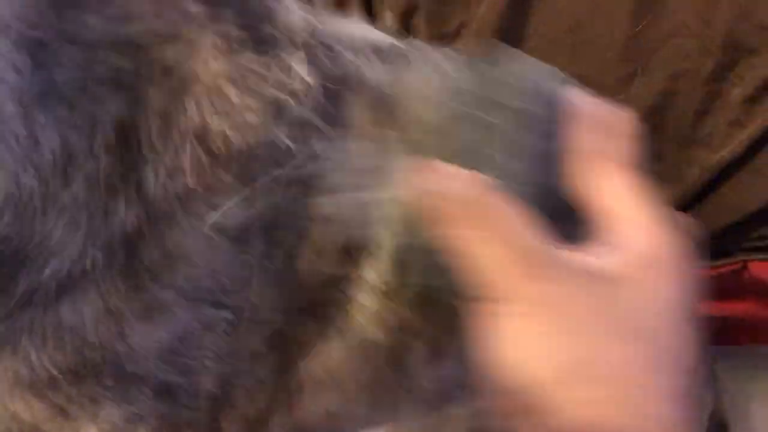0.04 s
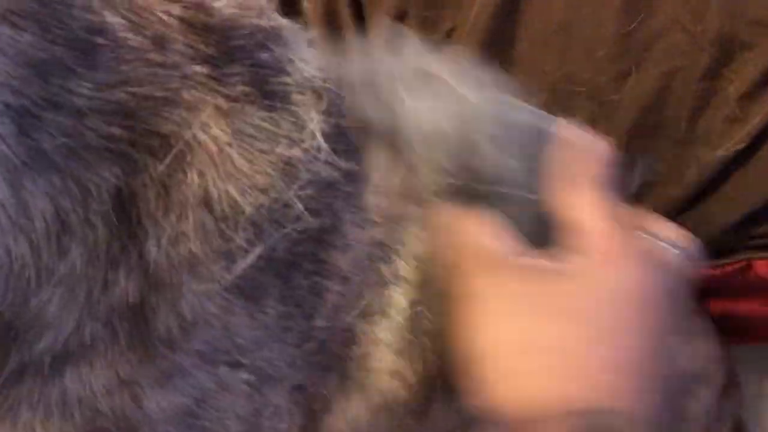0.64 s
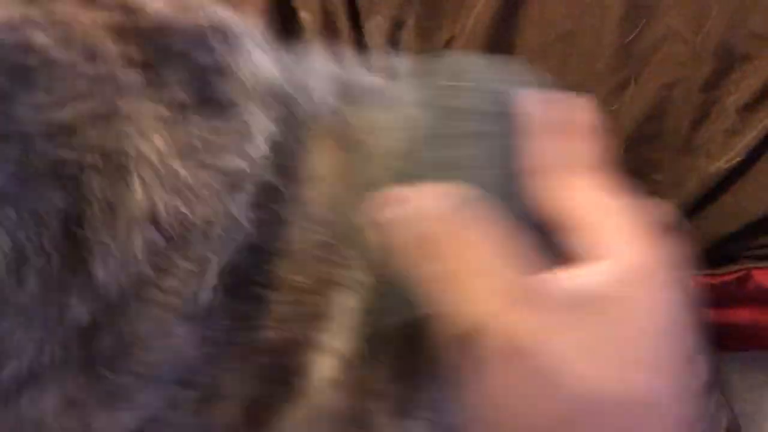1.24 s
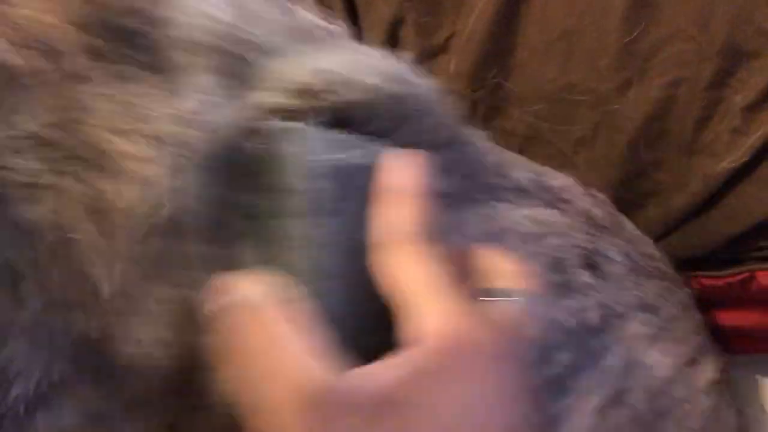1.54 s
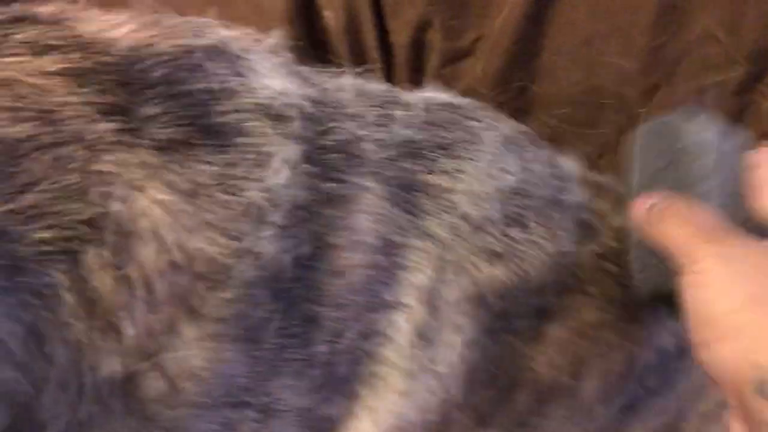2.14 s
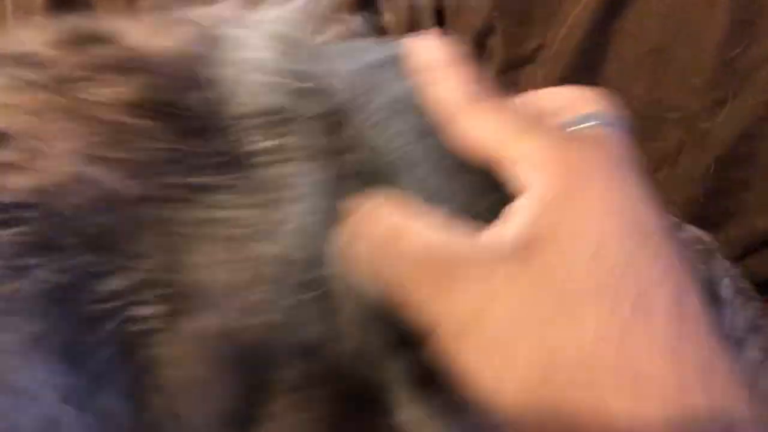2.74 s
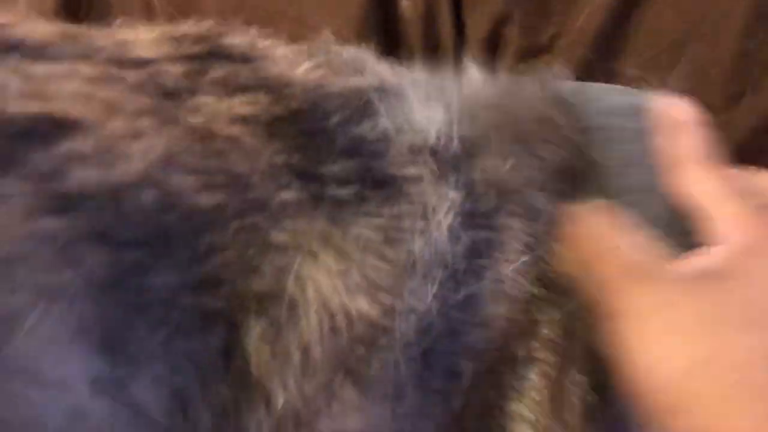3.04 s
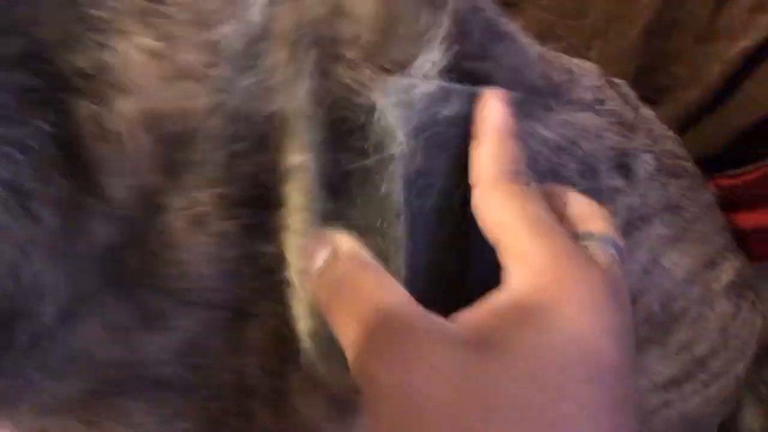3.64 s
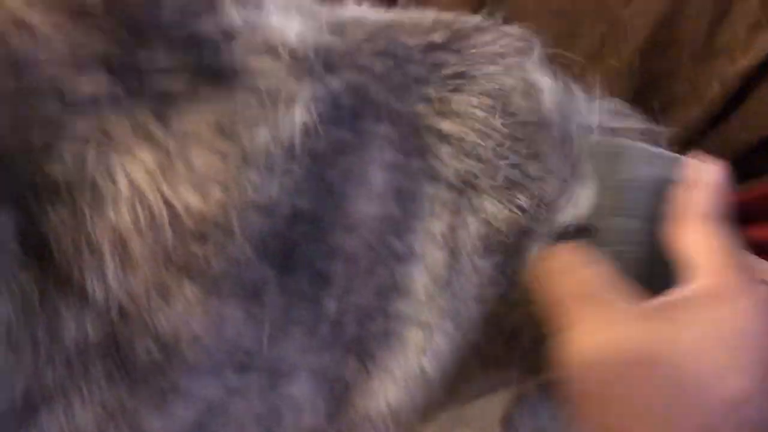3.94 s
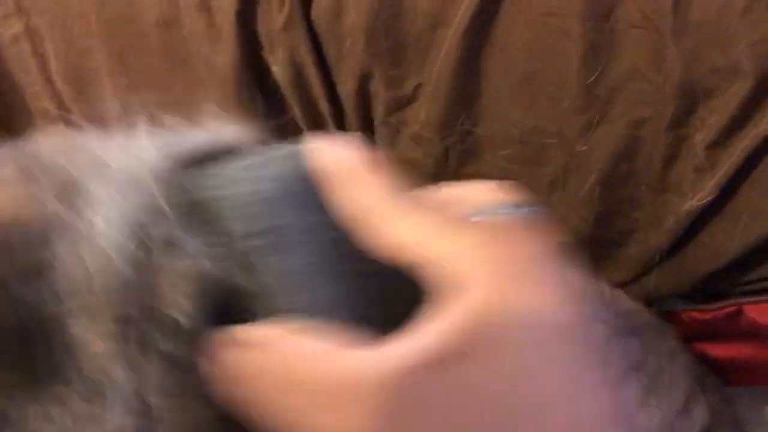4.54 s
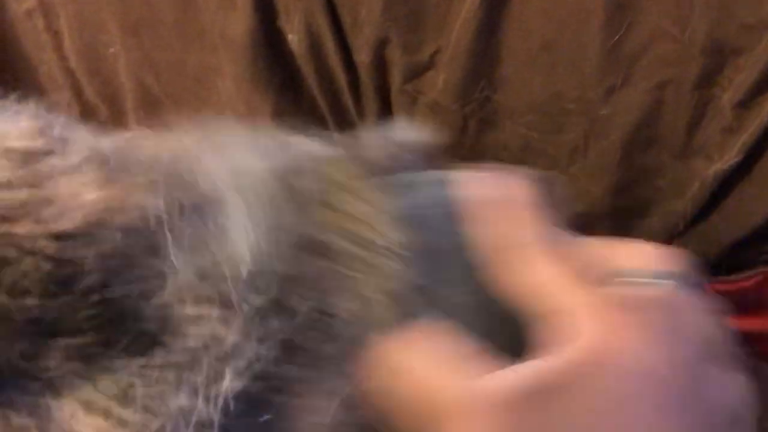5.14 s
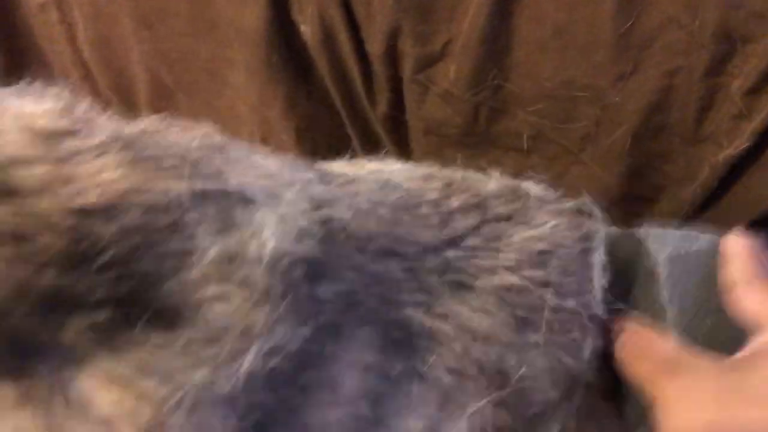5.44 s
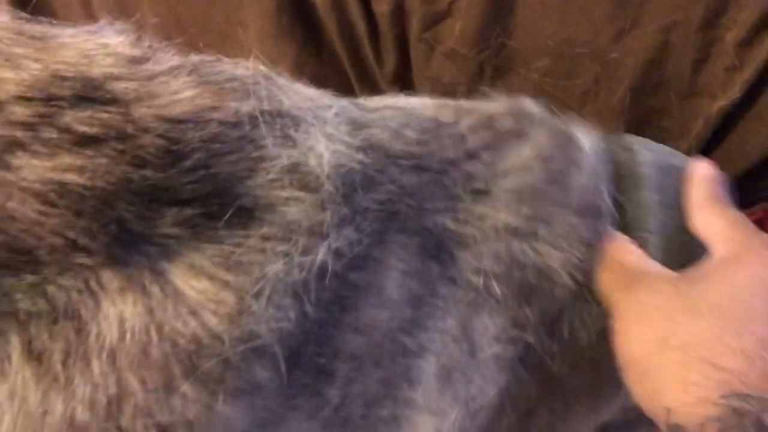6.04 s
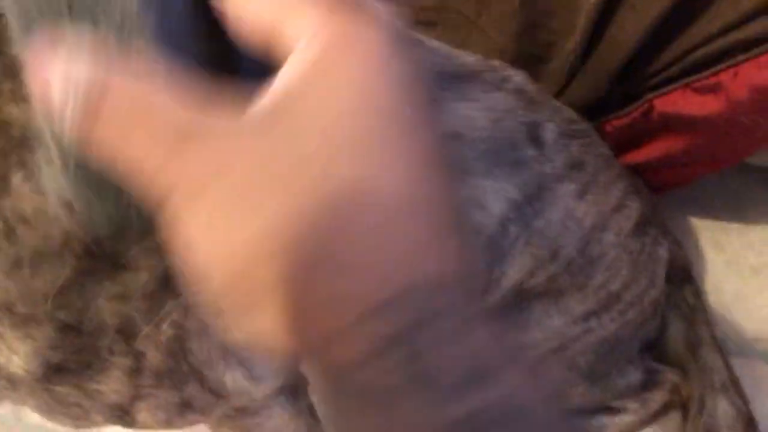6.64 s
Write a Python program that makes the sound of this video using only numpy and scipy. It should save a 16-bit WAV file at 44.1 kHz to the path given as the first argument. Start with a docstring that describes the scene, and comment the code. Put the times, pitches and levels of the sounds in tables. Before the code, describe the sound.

A rough block rasps over a dog's short coat in quick, close strokes, with soft thumps and small ticks in a quiet room.

```python
"""Grooming a dog's short coat

A porous block is raked over the fur about two and a half times a second, close by in a quiet room.
Hairs flick off its edge as a dense rasp and set it ringing in the treble; the contact point decides
which modes speak. Between strokes it scuffs the fur and lands on the flank with a soft thump. Snags
tick, ruffled hairs crackle, and later come tiny static sparks and a few faint squeaks."""
import sys
import numpy as np
from scipy import signal
from scipy.fft import rfft, irfft, next_fast_len
from scipy.io import wavfile
from scipy.ndimage import uniform_filter1d, map_coordinates

SR = 44100
rng = np.random.default_rng(int(sys.argv[2]) if len(sys.argv) > 2 else 0)


def waveform_to_disk(signal):
    """Save audio, clipped to [-1, 1], as 16-bit WAV at the path in sys.argv[1]."""
    frames = np.transpose(np.atleast_2d(signal))
    scaled = np.clip(frames, -1, 1) * 32767
    samples = np.round(scaled).astype(np.int16)
    wavfile.write(sys.argv[1], SR, samples)


N = 298557
TIME = np.arange(N) / SR
TOP_HZ = 15850

# Rumble and hiss of the room. Each row: frequency in Hz, relative spectral level in dB.
ROOM_SPECTRUM = [(20, -20), (32, -22), (48, 0.5), (65, -3.5), (88, 2), (130, -8), (180, -6.5), (290, -11),
                 (450, -18), (700, -24), (1100, -25.5), (2400, -40.5), (5000, -41), (16000, -62)]
# Rasp of the hairs. Each row: frequency in Hz, relative spectral level in dB.
RASP_SPECTRUM = [(60, -12.5), (200, 2.5), (450, -4), (750, -4), (1050, -1.5), (1700, -2), (2600, -3.6),
                 (3700, -5), (4900, -7), (6100, -4.5), (7600, -10), (8800, -7), (10400, -10.5),
                 (12500, -9.5), (15600, -11.5)]
# Modes of the block, four lengthwise, then three weak crosswise ones.
# Each row: frequency in Hz, half-width in Hz, relative level in dB.
BLOCK_MODES = [(5395, 130, 2.5), (6866, 294, 1.5), (8140, 220, 0), (13470, 205, -2.5), (9320, 230, -10),
               (9830, 160, -7.5), (11420, 540, -7)]
# Lowest resonance of the air gap between block, hand and coat. Each row: time in seconds, pitch in Hz.
GAP_PITCH = [(6.45, 1034), (6.8, 1434)]
# Faint squeaks. Each row: centre in seconds, half length in seconds, pitch in Hz, level in dB.
SQUEAKS = [(5.939, .05, 4490, -66.5), (6.193, 0.054, 3700, -68), (6.247, 0.039, 3709, -58.5)]
# The block lands or bears down on the flank.
# Each row: start in seconds, thump level in dB, starting pitch in Hz, relative scuff level in dB.
LANDINGS = [(.324, -56, 131.7, -47), (0.717, -40.5, 101, -66), (1.116, -49, 147, -67),
            (1.523, -38.5, 161, -55.5), (1.927, -45, 109, -59), (2.317, -31.5, 248, -53),
            (2.442, -40.5, 95, -47), (2.71, -37.5, 122, -44.5), (3.114, -48, 153, -46.5),
            (3.579, -48, 139, -53), (4.589, -46, 70, -60), (5.205, -47, 134, -63)]
# Snags and stronger sparks. Each row: start in seconds, peak level in dB, tilt in dB per octave.
TICKS = [(.891, -30, 1), (0.948, -22.5, 6), (1.345, -26, 2), (2.189, -31, 7), (3.337, -26.5, 3),
         (3.561, -20.5, 8), (3.583, -31.5, 6), (4.511, -34, -0.5), (4.602, -24, -1.5), (5.032, -38, -5),
         (5.062, -46, -9), (5.244, -38, 4), (5.731, -29, 15), (5.807, -20, 12), (6.162, -32.5, 16),
         (6.237, -42, 15), (6.562, -23, 0)]
# The edge catches the fur. Each row: centre in seconds, relative level in dB, half length in seconds,
# tilt in dB per octave, ring of the block in dB, contact point (0 at the end, 0.5 in the middle).
SCUFFS = [(0.026, -55, 0.051, 0.1, -4, 0.061), (0.128, -37.5, 0.0062, -0.3, 14, 0.5),
          (0.521, -41.5, 0.016, 1, 10, 0.041), (0.558, -49, .01, 0.5, 8, 0.035),
          (1.815, -61.5, 0.071, -3.5, -4, .05), (2.079, -37, 0.019, 2.5, 8, 0.063),
          (2.155, -58.5, 0.038, 1.5, 6, 0.28), (2.188, -49, 0.0038, -3, 22.5, .333),
          (2.472, -28.5, 0.0054, 1.5, 18.5, 0.4), (3.465, -45, 0.0058, -0.5, 10, 0.45),
          (3.505, -54.5, 0.034, -2, 8.5, 0.054), (3.868, -51.5, 0.006, -5.5, 26, .333),
          (3.927, -50.5, 0.0042, -1.5, 12, 0.28), (3.984, -44.5, 0.0053, 2, 13.5, 0.31),
          (3.999, -52.5, 0.0099, -2, 30, .13), (4.034, -55.5, 0.012, 10, 12, 0.076),
          (4.49, -48, 0.012, -1, 5, 0.032), (4.647, -38, 0.017, 1, -5, .45),
          (4.748, -51, .014, 1.5, 5, 0.18), (4.86, -53.5, 0.0099, -5.5, 1, .05),
          (5.051, -50, .01, -1, -4, .05), (5.801, -40, 0.022, 1, 11.5, .295),
          (6.076, -59.5, 0.014, 1, 2, 0.33)]
# Strokes grow rounder as the hand eases. Each row: time in seconds, relative steepness of the swell.
STEEPNESS = [(1, 3.5), (2, 3), (5, 2.52), (6.6, 1.95)]
# Strokes. Each row: fastest moment in seconds, relative level in dB, rise in seconds, fall in seconds,
# air gap resonance in dB, ring of the block in dB, contact point (0 at the end, 0.5 in the middle).
STROKES = [(.125, -43.5, 0.041, 0.032, 1.5, 7, .42), (.502, -42, 0.073, 0.053, -1.5, 5.5, 0.035),
           (.9, -40.5, 0.061, 0.047, 3, 6, .05), (1.293, -40, 0.059, 0.049, -1, 6.5, 0.12),
           (1.66, -39, 0.037, 0.05, -5, 7, 0.13), (2.061, -41, 0.045, 0.03, -1, 5.5, 0.035),
           (2.463, -37, 0.039, 0.043, 1.5, 8, .38), (2.9, -43, 0.072, 0.046, -1, 4.5, 0.38),
           (3.345, -43, 0.094, .054, -12, 5.5, 0.42), (3.808, -40.5, 0.077, 0.034, -14, 4, 0.02),
           (4.222, -44, 0.067, 0.054, -4, 9, .29), (4.598, -39.5, 0.031, 0.016, -2, 5, 0.4),
           (4.64, -39, .02, 0.033, 5, 5.5, .47), (4.982, -40.5, 0.045, 0.041, 1.5, 1.5, 0.43),
           (5.35, -43.3, 0.047, 0.052, -2.5, 4, 0.33), (5.793, -41, 0.057, 0.035, -3.5, 8.5, 0.28),
           (6.45, -42.5, 0.062, 0.041, 2.5, 7.5, 0.19), (6.629, -43.5, 0.091, 0.063, -2, 10, .18),
           (6.771, -49, 0.095, .03, -10, 12, 0.21)]


def amp(db):
    """Decibels to amplitude ratio."""
    return 10 ** (np.asarray(db) / 20)


def unit(x):
    """Normalisation to an rms of 1."""
    return x / np.sqrt(np.mean(x ** 2) + 1e-20)


def along(points, hz):
    """Interpolation of (Hz, value) points on a logarithmic frequency axis."""
    knots_hz, values = np.transpose(points)
    return np.interp(np.log(hz + 1), np.log(knots_hz), values)


def wobble(t, rate):
    """Smooth random modulation: a spline with `rate` knots a second."""
    return map_coordinates(rng.standard_normal(1024), [(t - t[0]) * rate], mode="wrap")


def around(size):
    """Time in seconds, for `size` samples on each side of an event."""
    return np.arange(-size, size) / SR


def add(track, s, sound):
    """Superposition: the sound joins the track, centred on time s."""
    at = round(s * SR) - len(sound) // 2 + np.arange(len(sound))
    inside = (at >= 0) & (at < N)
    track[at[inside]] += sound[inside]


def filtered(x, response):
    """Zero-phase filtering by a function of frequency."""
    size = next_fast_len(len(x) + 2048)
    return irfft(rfft(x, size) * response(np.fft.rfftfreq(size, 1 / SR)), size)[:len(x)]


def resound(x, gain):
    """Causality: a minimum-phase body with this gain over frequency rings only after it is struck."""
    size = next_fast_len(len(x) + 2048)
    size += size % 2
    magnitude = np.maximum(gain(np.fft.rfftfreq(size, 1 / SR)), 1e-6)
    cepstrum = irfft(np.log(magnitude), size)
    cepstrum[1:size // 2] *= 2
    cepstrum[size // 2 + 1:] = 0
    return irfft(rfft(x, size) * np.exp(rfft(cepstrum)), size)[:len(x)]


def resonance(hz, centre, half_width, db):
    """Power response of one resonance, 6 dB down at a half-width from its centre."""
    return (amp(db) / (1 + ((hz - centre) / half_width) ** 2)) ** 2


def mode_drive(ring_db, point, node_db):
    """Modal coupling in dB: each lengthwise mode loses node_db when rubbed at one of its nodes."""
    return ring_db - node_db * np.sin(np.pi * point * np.arange(1, 5)) ** 2


def colour(hz, tilt, modes_db=(), gap_power=0):
    """Powers add: rasp, air gap and block modes form one normalised gain, tilted in dB per octave."""
    power = amp(along(RASP_SPECTRUM, hz)) ** 2 + gap_power
    for k, (centre, half_width, db) in enumerate(BLOCK_MODES):
        change_db = modes_db[k] if k < len(modes_db) else 0
        power = power + resonance(hz, centre, half_width, db + change_db)
    gain = np.sqrt(power) * amp(tilt * np.log2(np.clip(hz, 500, TOP_HZ)))
    return gain / np.sqrt(np.mean(gain ** 2 * (hz < TOP_HZ)))


def flicks(t, rate, spread_db, slide):
    """Friction as shot noise: hairs flick off the edge as uneven impulses over a sliding hiss."""
    struck = rng.random(len(t)) < rate / SR
    sign, size, hiss = rng.standard_normal((3, len(t)))
    impulses = struck * np.sign(sign) * amp(spread_db * size.clip(-2, 2))
    return unit(unit(impulses) + slide * hiss)


def room(level_db=-58.0):
    """Stationary noise: a low rumble under a faint hiss."""
    noise = filtered(rng.standard_normal(N), lambda hz: amp(along(ROOM_SPECTRUM, hz)))
    return amp(level_db) * unit(noise)


def rustle(level_db=-69.0, tilt=0.3, damped_db=-8):
    """Elastic recovery: ruffled hairs spring back in a faint crackle that hardly rings the block."""
    stir = amp(level_db + 2.8 * wobble(TIME, rate=48))
    force = stir * flicks(TIME, rate=250, spread_db=10, slide=2.0)
    return resound(force, lambda hz: colour(hz, tilt, [damped_db] * len(BLOCK_MODES)))


def sparks(full_rate=9, level_db=-49, spread_db=4, edge_hz=12000):
    """Frictional charging: the brushed coat gives off thin static ticks, more often as charge builds."""
    charge = np.clip(TIME / TIME[-1] * 2 - .5, 0, 1)
    fired = rng.random(N) < charge * full_rate / SR
    cracks = fired * amp(level_db + spread_db * rng.standard_normal(N).clip(-2, 2))
    return resound(cracks, lambda hz: 2 / (1 + (edge_hz / (hz + 1)) ** 4))


def squeaks(waver=0.0075):
    """Random modulation of pitch and level makes thin tones waver as they swell and fade."""
    out, t = np.zeros(N), around(SR // 6)
    for s, half_s, hz, db in SQUEAKS:
        cycles = np.cumsum(hz * (1 + waver * wobble(t, rate=160))) / SR
        swell = amp(db + 3.4 * wobble(t, rate=53.4)) * np.exp(-(t / half_s) ** 2)
        add(out, s, swell * np.sin(2 * np.pi * cycles))
    return out


def thumps(rest_hz=76.5, attack_s=0.0017, settle_s=0.011, pat_db=-7, pat_ratio=1.95, pat_damping_s=0.13):
    """Damped oscillation: the flank gives with a pat and a low swing that sags as the push eases."""
    out, t = np.zeros(N), np.maximum(around(SR // 3), 0)
    for s, db, start_hz, _ in LANDINGS:
        t60 = .155 * amp(-.3 * (db + 40))  # a firmer hand damps the flank sooner
        decay_db = -60 * t / t60
        cycles = rest_hz * t + (start_hz - rest_hz) * settle_s * (1 - np.exp(-t / settle_s))
        swing = amp(decay_db) * np.sin(2 * np.pi * cycles)
        pat = amp(pat_db + decay_db - 60 * t / pat_damping_s) * np.sin(2 * np.pi * pat_ratio * cycles)
        add(out, s, amp(db) * (1 - np.exp(-t / attack_s)) * (swing + pat))
    return out


def ticks(t60=0.0028):
    """Impulsive excitation: a snag lets go or a spark jumps, and the crack dies in milliseconds."""
    out, t = np.zeros(N), around(1024)
    for s, db, tilt in TICKS:
        burst = (t >= 0) * amp(-60 * np.abs(t) / t60) * rng.standard_normal(len(t))
        crack = resound(burst, lambda hz: colour(hz, tilt))
        add(out, s, amp(db) * crack / np.abs(crack).max())
    return out


def scuffs(trim_db=0.25, damped_db=-3, grazes_per_s=5.6, lag_s=.006):
    """Transient friction: a corner of the block catches, lands on or grazes the fur in a coarse burst."""
    out, t = np.zeros(N), around(SR // 12)
    # Rows as in SCUFFS. The block lands near one end, so its lowest mode rings.
    landings = [(s + lag_s, db, 0.0069, 0.1, 16.5, 0.156) for s, _, _, db in LANDINGS]
    graze_times = TIME[rng.random(N) < grazes_per_s / SR]
    grazes = [(s, -68, 0.0066, 5.0, 9, rng.random() / 2) for s in graze_times]
    for s, db, half_s, tilt, ring_db, point in SCUFFS + landings + grazes:
        modes_db = np.maximum(mode_drive(ring_db, point, node_db=30), damped_db)
        swell = amp(db + trim_db + 1.5 * wobble(t, rate=380)) * np.exp(-(t / half_s) ** 2)
        force = swell * flicks(t, rate=3000, spread_db=6.0, slide=0.87)
        add(out, s, resound(force, lambda hz: colour(hz, tilt, modes_db)))
    return out


def air_gap(hz, s, db, overtone_ratio=2.45):
    """Cavity resonance: power of two modes of the air under the hand, rising in the last slow rub."""
    lowest_hz = np.interp(s, *np.transpose(GAP_PITCH))
    upper_hz = lowest_hz * overtone_ratio
    lowest = resonance(hz, lowest_hz, 0.14 * lowest_hz, db)
    return lowest + resonance(hz, upper_hz, 0.25 * upper_hz, db - 2)


def moving_contact(x, depth_db=1.9, ring_depth_db=3.0):
    """Varying coupling: as the contact moves, narrow bands flare and fade, most where the block rings."""
    hz, _, spectra = signal.stft(x, SR, nperseg=512)
    flicker = uniform_filter1d(rng.standard_normal(spectra.shape), size=5, axis=0)  # across frequency
    flicker = uniform_filter1d(flicker, size=7, axis=1)  # across time
    depth = along([(3000, depth_db), (5500, ring_depth_db), (8500, ring_depth_db), (14000, depth_db)], hz)
    gain = amp(depth[:, None] * unit(flicker))
    gain /= np.sqrt(np.mean(gain ** 2, axis=1, keepdims=True))
    return signal.istft(spectra * gain, nperseg=512)[1][:N]


def strokes(trim_db=-0.06, usual_db=-42, grip_scatter_db=0.3):
    """Forced vibration: flicking hairs drive the block, which rings more once its edge has bitten in."""
    out, t = np.zeros(N), around(SR // 2)
    contact = signal.windows.tukey(len(t), .7)  # the far tails of each stroke fade smoothly to nothing
    for s, db, rise_s, fall_s, gap_db, ring_db, point in STROKES:
        exponent = 0.98 * np.interp(s, *np.transpose(STEEPNESS))
        tilt = 0.59 + 0.15 * (db - usual_db)  # harder strokes are brighter
        grip_db = grip_scatter_db * rng.standard_normal(4)  # each grip damps the modes anew
        modes_db = mode_drive(ring_db, point, node_db=8) - grip_db  # the broad face blurs the nodes
        progress = t / np.where(t < 0, rise_s, fall_s)
        swell = amp(db + trim_db) * contact / (1 + np.abs(progress) ** exponent)
        tufts = amp(0.22 * wobble(t, rate=40) + 0.37 * wobble(t, rate=260))  # the coat resists in clumps
        force = swell * tufts * flicks(t, rate=4500, spread_db=3.5, slide=0.85)
        # The edge digs in, then comes free; the force is shared between sliding and biting.
        bite = (1 + np.tanh(progress + 0.72)) / 2 * np.exp(-(progress / 1.7) ** 2)
        for share, extra_tilt, damping_db in [(1 - bite, 0.5, 6), (bite, 0.85, 1)]:
            body = lambda hz: colour(hz, tilt + extra_tilt, modes_db - damping_db, air_gap(hz, s, gap_db))
            add(out, s, resound(force * share, body))
    return moving_contact(out)


def scene():
    """Superposition of direct sound: all sources are close and dry, on one channel."""
    return (strokes() + scuffs() + ticks() + thumps() + squeaks() + rustle() + sparks() + room())[None]


def record(dry):
    """Band limiting: an ideal low-pass filter removes everything above TOP_HZ."""
    return filtered(dry[0], lambda hz: hz < TOP_HZ)[None]


dry = scene()
out = record(dry)
waveform_to_disk(out)
```